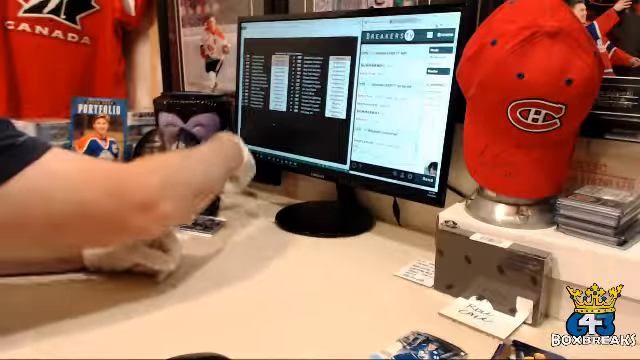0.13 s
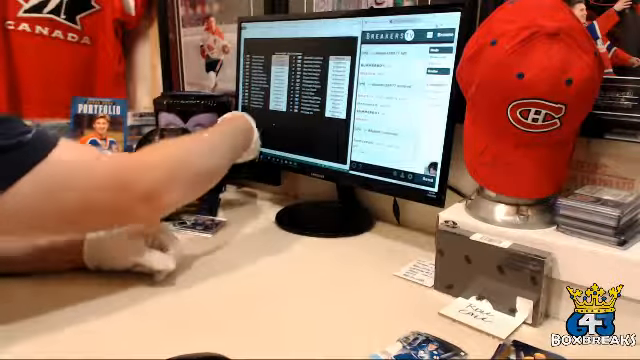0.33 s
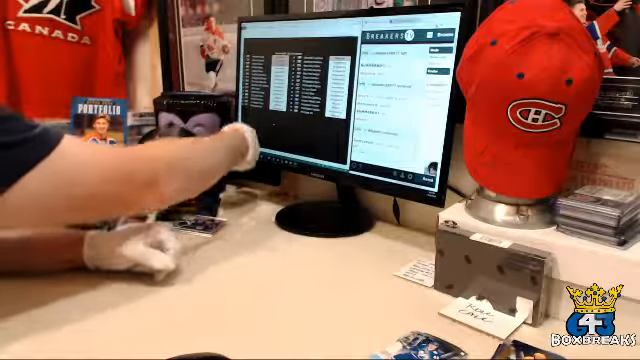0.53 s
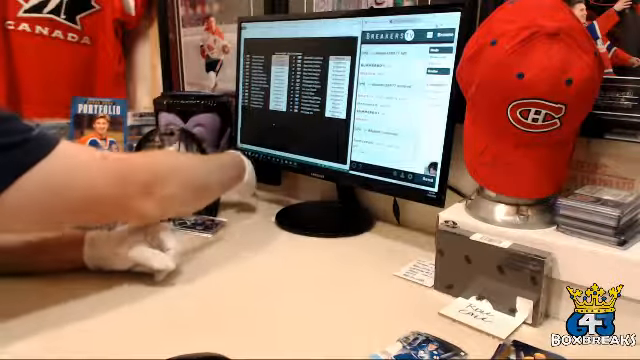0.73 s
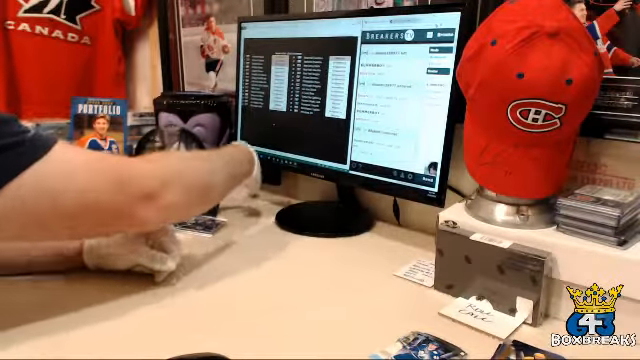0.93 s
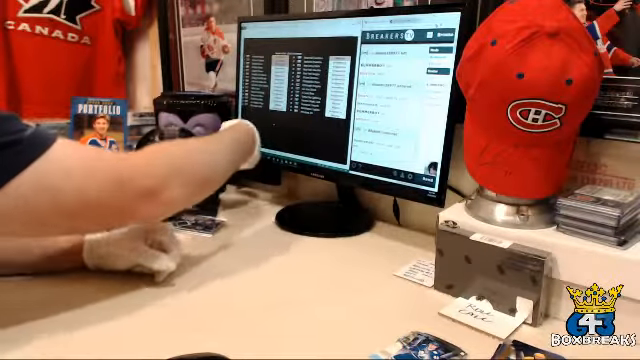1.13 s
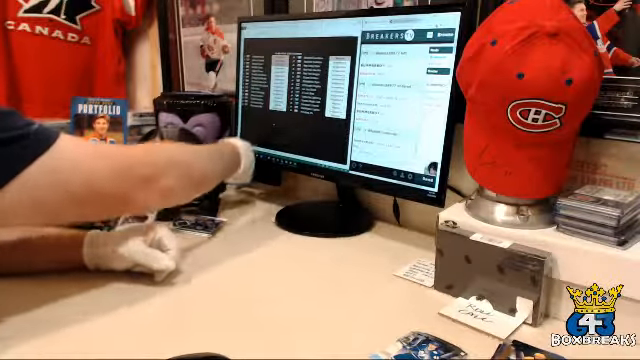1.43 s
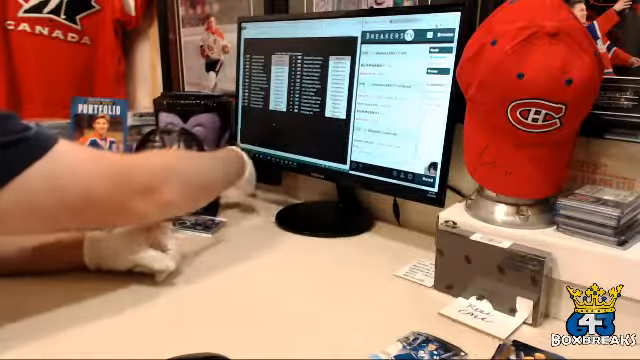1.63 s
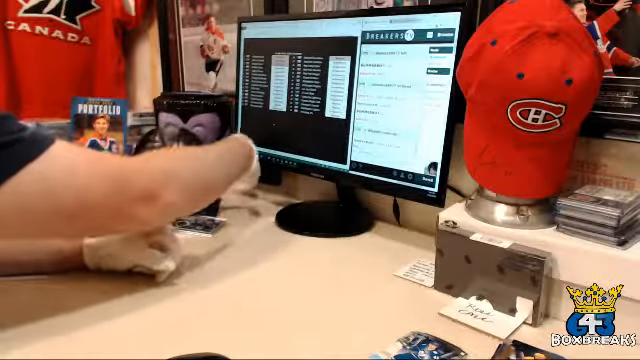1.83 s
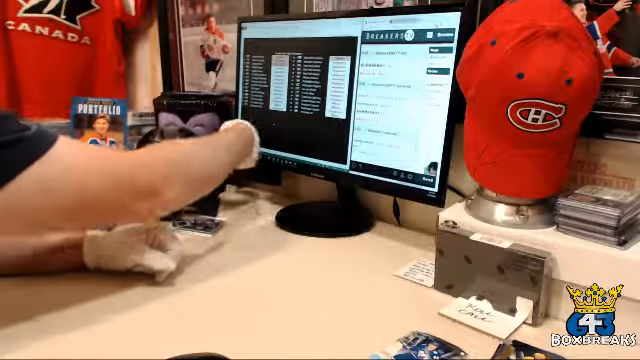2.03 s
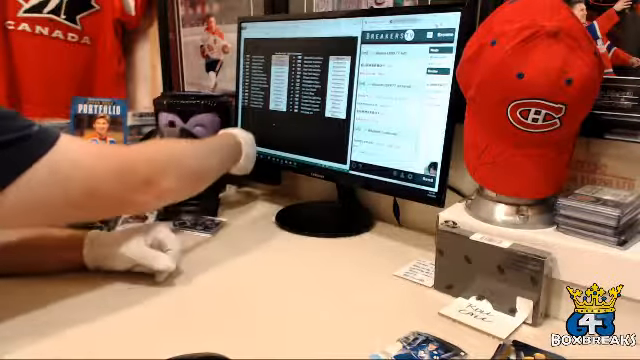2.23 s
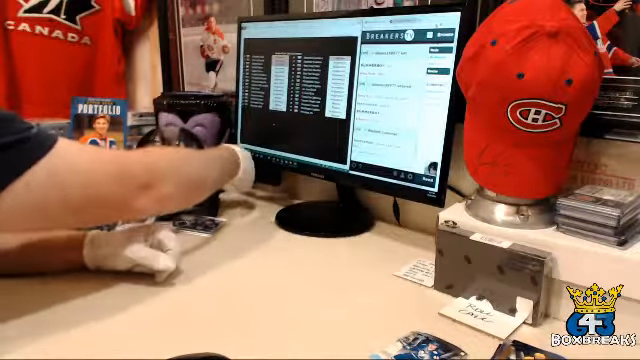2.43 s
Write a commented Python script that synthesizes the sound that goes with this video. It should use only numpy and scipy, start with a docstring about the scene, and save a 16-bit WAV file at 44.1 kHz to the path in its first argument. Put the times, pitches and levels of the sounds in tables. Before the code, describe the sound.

Balls tumble inside a turning wire cage, clacking together and ringing the wires, loudest near the start and gentler later. The stand rumbles and knocks on the desk, slightly to the left, over faint room noise.

```python
"""Light balls tumble in a small wire cage, cranked by hand on a desk, in a dense bright rattle that
surges with each fall. Each impact excites the damped modes of a body: balls crack together, the wires
ring as balls roll over them or land in heaps, and the stand rumbles and thuds on the desk. The low
sounds lie to the left, with a diffuse stereo spread, over a faint low room noise."""
import sys
import numpy as np
from scipy import signal
from scipy.fft import rfft, irfft
from scipy.io import wavfile

SR = 44100
rng = np.random.default_rng(int(sys.argv[2]) if len(sys.argv) > 2 else 0)


def store_wav(level_fs):
    """Save 16-bit WAV to argv[1]."""
    pcm = np.round(np.clip(np.atleast_2d(level_fs), -1, 1) * 32767)
    wavfile.write(sys.argv[1], SR, pcm.T.astype(np.int16))


N = 114660

# ball-on-ball rattle: t/s, level/dB, share of the lower treble/dB
RATTLE_LEVELS = [(0, -48.5, -1), (.105, -45, -0.5), (.125, -39, -3.5), (.17, -45.5, -0.5),
                 (.221, -42, -2.5), (.228, -20.5, -8.5), (.246, -28, -4.5), (.27, -20.5, -0.5),
                 (.31, -19, -1.5), (.345, -21.5, -4), (.37, -27, -2.5), (.382, -30.5, -28),
                 (.41, -34.5, -4), (.435, -27, -16), (.46, -41.5, -4), (.476, -38, 0), (.5, -41, -1),
                 (.525, -39, -1.5), (.63, -45, -0.5), (.648, -37, -3), (.665, -39, -4.5), (.695, -31, -1),
                 (.708, -25.5, -4), (.73, -32.5, -2), (.742, -38, -1), (.766, -26.5, 0),
                 (.797, -34.5, -6.5), (.811, -27, -1), (.835, -29.5, -13), (.86, -36, -4), (.875, -39, -3),
                 (1.206, -42.5, -1.5), (1.213, -38.5, 1), (1.235, -40, -5.5), (1.265, -34.5, 2),
                 (1.3, -40.5, -2.5), (1.34, -35.5, -2), (1.378, -26, -5.5), (1.405, -36, -5),
                 (1.53, -38, -1), (1.69, -43.5, -2), (1.71, -38.5, -1.5), (1.8, -40, -2),
                 (1.88, -37.5, -1.5), (1.93, -38.5, -1.5), (2.01, -34.5, -0.5), (2.05, -40.5, -2),
                 (2.19, -38, -2.5), (2.36, -42.5, -2), (2.4, -39.5, -2.5), (2.54, -39, -1)]
# balls rolling on the wires, stand rumbling on the desk: t/s, level/dB
ROLL_LEVELS = [(0, -53), (.1, -50), (.14, -50.5), (.22, -51.5), (.229, -28), (.3, -30), (.37, -32),
               (.392, -47.5), (.45, -39.5), (.52, -47.5), (.63, -47.5), (.71, -41), (.77, -44.5),
               (.84, -43), (.95, -45.5), (1.2, -48.5), (1.213, -42.5), (1.33, -39.5), (1.39, -36.5),
               (1.42, -44), (1.5, -45.5), (1.54, -49), (1.69, -46), (1.72, -45.5), (1.93, -45),
               (2.008, -42), (2.05, -46.5), (2.14, -41), (2.24, -47), (2.37, -47.5), (2.4, -45),
               (2.55, -45)]
RUMBLE_LEVELS = [(0.0, -52), (.21, -52), (.29, -41.5), (.4, -45.5), (.55, -51), (0.74, -42.5), (.93, -47.5),
                 (1.18, -53), (1.27, -40), (1.4, -44.5), (1.67, -51.5), (1.74, -51), (2.0, -45), (2.3, -47),
                 (2.6, -47)]
# spectral envelopes of the three bodies and the room noise: f/Hz, spectral level/dB
BALL_SPECTRUM = [(1940, -28), (3300, -10.5), (3930, -9.5), (4770, -4), (5820, -4), (6300, -5.5), (6650, -4),
                 (7590, -9), (8750, -23.5), (9300, -73)]
WIRE_SPECTRUM = [(390, -23), (660, -5), (719, 1.5), (870, 0.5), (955, 2.5), (1140, 3.5), (1430, -2.5),
                 (1590, 2), (1960, 0.5), (3600, -15), (4680, -42)]
DESK_SPECTRUM = [(25, -34.5), (43, -25.5), (111, -4.5), (136, 0), (281, -0.5), (321, -7), (367, -9),
                 (620, -10.5), (810, -62.5)]
AIR_SPECTRUM = [(20, -22), (80, -17), (140, 2.5), (300, -2.5), (600, -13.5)]
# normal modes: f/Hz, gain/dB, bandwidth/Hz
BALL_MODES = [(4424, -0.5, 65), (4720, 5, 40), (4930, 1, 89), (6230, 1.5, 104), (6434, 2.5, 87),
              (6526, 10.5, 10), (6830, 4.5, 190), (7300, 2.5, 160)]
WIRE_MODES = [(714, 8.6, 71), (805, 0.59, 39), (953, 8.6, 38), (1095, 4.8, 17), (1194, 3, 113),
              (1528, 5.6, 39), (1625, 6.4, 25), (2102, 3.7, 17), (2216, 6.5, 30), (2303, 1, 22),
              (2510, 2.5, 81), (2703, 15, 13), (3407, 6.1, 65)]
DESK_MODES = [(105, 10.2, 11), (143, 7, 19), (203.4, 3.5, 54), (238.2, 2.1, 28), (314.3, 9.3, 26),
              (324.8, 2.2, 19), (360, 6.3, 41), (411.7, 1.5, 160)]
# impacts: centre t/s, duration/s, favoured f/Hz, level/dB
HEAP_CLANGS = [(.142, 0.022, 897, -41), (.235, 0.0094, 1200, -25), (.253, 0.016, 1120, -21),
               (.254, 0.041, 2380, -28), (.32, 0.13, 1330, -33.5), (.345, 0.031, 1063, -36),
               (.43, 0.029, 990, -35.5), (.46, 0.029, 910, -31.5), (.659, 0.034, 2160, -37),
               (.71, 0.013, 2250, -28), (.65, 0.02, 980, -44), (.735, 0.057, 2410, -36.5),
               (.825, 0.037, 1227, -34), (.86, 0.026, 1200, -42), (.935, 0.024, 920, -40.5),
               (1.231, 0.024, 3280, -40), (1.329, 0.015, 2200, -34), (1.33, 0.0048, 697, -39),
               (1.365, 0.016, 1095, -32), (1.365, 0.051, 3070, -34.5), (1.495, 0.032, 1230, -40.5),
               (1.499, 0.035, 2220, -40), (1.837, 0.024, 1240, -44.5), (1.885, 0.05, 1260, -41.5),
               (1.965, 0.019, 1240, -37.5), (2.007, 0.023, 657, -42.5), (2.009, 0.028, 1102, -36.5)]
STAND_THUDS = [(.436, 0.052, 161.4, -36), (.5, 0.058, 123.4, -39.5), (.587, 0.029, 146, -37),
               (.65, 0.024, 346, -38.5), (.701, 0.029, 303, -30), (.768, 0.052, 285, -34),
               (.81, .035, 348, -32.5), (.879, 0.065, 320, -41.5), (.94, 0.049, 332, -44),
               (1.274, 0.027, 218, -32), (1.29, 0.013, 325, -32.5), (1.387, 0.044, 148, -36),
               (1.382, 0.04, 328, -30.5), (1.441, 0.053, 344, -41.5), (1.497, 0.018, 275, -35),
               (1.735, 0.041, 374, -40), (1.78, 0.036, 233, -41), (1.938, 0.053, 133, -42.5),
               (2.0, 0.022, 433, -36), (1.996, 0.022, 117.4, -42.5), (2.011, 0.068, 241, -41.5),
               (2.057, 0.18, 357, -44.5), (2.138, 0.022, 313, -30.5), (2.17, 0.04, 159.4, -32),
               (2.203, 0.046, 138.6, -32.5), (2.226, 0.028, 368, -37), (2.257, 0.039, 124, -41.5),
               (2.278, 0.021, 275, -33.5), (2.42, 0.06, 308, -44.5)]
BALL_CLACKS = [(.5, 0.014, 6400, -32), (.697, 0.0067, 5950, -23), (.712, 0.018, 6160, -26.5),
               (.768, 0.031, 4330, -32.5), (.812, .014, 7200, -27), (1.215, 0.01, 5560, -35)]
WIRE_NOTES = [(1.284, 0.027, 972, -30), (1.33, 0.038, 2760, -34), (1.722, 0.033, 1590, -39),
              (1.765, 0.033, 1620, -41), (2.024, 0.043, 1600, -34.5), (2.155, 0.039, 950, -36),
              (2.28, 0.12, 2700, -55.5)]
# stereo balance: f/Hz, left minus right level/dB
LEFT_BIAS = [(60, 2.5), (100, 7), (180, 8.5), (310, 0), (550, 4.5), (950, 2.5), (1650, 1.5), (2870, -1),
             (4980, 0), (8650, 1)]
# diffuse stereo spread: f/Hz, level relative to the direct sound/dB
STEREO_WIDTH = [(60, 4), (150, -27), (500, -22.5), (1200, -36.5), (2200, -48), (2900, -10), (4200, -21),
                (5000, -31.5), (8500, -33)]

CONTACTS_PER_S, CONTACT_SPREAD_DB = 12000, 3.0
CLUMP_DB, CLUMP_HZ = 2, 46
MODE_SPREAD_DB, SWELL_EXPONENT = 3.5, 2.96   # an exponent above 2 flattens the top of the bell
TILT_DB_PER_DB, GENTLE_DB, THINNING = 0.3949, -55.5, 1.25
SPLIT_HZ, CUTOFF_HZ = 5350, 9170
AIR_DB, DIFFUSION_S = -59.5, 0.1


def from_db(db):
    """Amplitude ratio of a level."""
    return 10 ** (np.asarray(db) / 20)


def unit_rms(x):
    """Normalisation to rms 1."""
    return x / np.sqrt(np.mean(x ** 2) + 1e-20)


def in_time(rows):
    """Linear interpolation of each column at every sample."""
    times, *columns = np.transpose(rows)
    return [np.interp(np.arange(N) / SR, times, column) for column in columns]


def response(points):
    """Frequency response on the FFT grid, and steep skirts outside the table's range."""
    hz, db = np.transpose(points)
    log_f = np.log(np.arange(1, N // 2 + 2) * SR / N)
    outside = np.maximum(np.log(hz[0]) - log_f, 0) + np.maximum(log_f - np.log(hz[-1]), 0)
    return from_db(np.interp(log_f, np.log(hz), db)), from_db(-120 * outside)


def contacts():
    """Shot noise: impulses of random size and sign, clumped by slow amplitude modulation."""
    sizes = from_db(CONTACT_SPREAD_DB * np.minimum(rng.exponential(1, N), 3.2)) * rng.choice([-1, 1], N)
    r = np.exp(-2 * np.pi * CLUMP_HZ / SR)
    clumps = unit_rms(signal.lfilter([1], [1, -2 * r, r * r], rng.standard_normal(N)))
    return unit_rms(sizes * from_db(CLUMP_DB * clumps) * (rng.random(N) < CONTACTS_PER_S / SR))


def body(force, modes, spectrum):
    """Superposition: the contact plus one damped resonator per mode, under a spectral envelope."""
    out = force.copy()
    for hz, db, width in modes:
        r = np.exp(-np.pi * width / SR)
        feedback = [1, -2 * r * np.cos(2 * np.pi * hz / SR), r * r]
        out += from_db(db) * signal.lfilter([(1 - r * r) / 2, 0, (r * r - 1) / 2], feedback, force)
    gain, skirts = response(spectrum)
    return irfft(rfft(out) * gain * skirts, N)


def tumble(level_db, modes, spectrum):
    """Forced vibration of a body under random contacts."""
    hits = contacts()
    return body(hits * from_db(level_db), modes, spectrum) / np.std(body(hits, modes, spectrum))


def ball_rattle():
    """Collisions excite the balls' modes; lower and upper treble divide the power in a varying ratio."""
    level_db, low_db = in_time(RATTLE_LEVELS)
    low, high = (signal.sosfilt(signal.butter(4, SPLIT_HZ, kind, fs=SR, output="sos"),
                                tumble(0, BALL_MODES, BALL_SPECTRUM)) for kind in ("low", "high"))
    share = np.clip(from_db(low_db), .1, .97)
    return from_db(level_db) * (share * unit_rms(low) + np.sqrt(1 - share ** 2) * unit_rms(high))


def rolling():
    """Rolling contact drives the wires; harder rolling tilts the spectrum from bass to treble."""
    level_db, = in_time(ROLL_LEVELS)
    roll = tumble(level_db, WIRE_MODES, WIRE_SPECTRUM)
    tilt = from_db(TILT_DB_PER_DB * (level_db - GENTLE_DB))
    low, high = (signal.sosfiltfilt(signal.butter(4, hz, kind, fs=SR, output="sos"), roll)
                 for hz, kind in ((880, "low"), (2600, "high")))
    return roll + low * (tilt ** -THINNING - 1) + high * (tilt - 1)


def stand_rumble():
    """Structure-borne sound: the stand drives the desk's low modes."""
    return tumble(in_time(RUMBLE_LEVELS)[0], DESK_MODES, DESK_SPECTRUM)


def room_noise():
    """Low ambient noise, uncorrelated between the sides."""
    gain, skirts = response(AIR_SPECTRUM)
    return from_db(AIR_DB) * unit_rms(irfft(rfft(rng.standard_normal((2, N))) * gain * skirts, N))


def knocks(events, modes, reach_octaves, chatter, chatter_rise=0):
    """Band-limited bursts: modes near the favoured pitch rise and fall under a bell-shaped envelope amid
    contact noise."""
    out, hits = np.zeros(N), contacts()
    hz, db, _ = np.transpose(modes)
    shape = len(events), len(hz)
    phases, scatters = rng.random(shape), rng.standard_normal(shape)
    for (centre, length, pitch, level_db), phase, scatter in zip(events, phases, scatters):
        n = np.arange(N)[max(int((centre - 2 * length) * SR), 0):int((centre + 2 * length) * SR)]
        swell = np.exp(-np.abs(2 * (n / SR - centre) / length) ** SWELL_EXPONENT)
        nearness = np.exp(-.5 * (np.log2(hz / pitch) / reach_octaves) ** 2)
        gains = from_db(db + MODE_SPREAD_DB * scatter) * nearness
        partials = np.sin(2 * np.pi * (np.outer(hz, n) / SR + phase[:, None]))
        ring = (gains / np.sqrt(np.sum(gains ** 2) / 2)) @ partials
        edges_hz = pitch * 2 ** (1.13 * reach_octaves * np.array([-1, 1]))
        noise = signal.sosfilt(signal.butter(2, edges_hz, "band", fs=SR, output="sos"), hits[n])
        noise /= np.sqrt(np.average(noise ** 2, weights=swell ** 2))
        noise_share = np.clip(chatter * (pitch / 1000) ** chatter_rise, 0, 1)
        blow = np.sqrt(1 - noise_share ** 2) * ring + noise_share * noise
        out[n] += from_db(level_db) * swell * blow / np.sqrt(np.average(blow ** 2, weights=swell ** 2))
    return out


def heap_clangs():
    """The impact of a heap of balls excites the wires' modes; higher clangs are noisier."""
    return knocks(HEAP_CLANGS, WIRE_MODES, reach_octaves=.14, chatter=.66, chatter_rise=.23)


def stand_thuds():
    """The stand's impacts excite the desk's modes."""
    return knocks(STAND_THUDS, DESK_MODES, reach_octaves=.23, chatter=.45)


def ball_clacks():
    """Single collisions briefly excite the balls' high modes."""
    return knocks(BALL_CLACKS, BALL_MODES, reach_octaves=.062, chatter=.76)


def singing_wire():
    """Narrow-band resonance: one wire rings nearly alone."""
    return knocks(WIRE_NOTES, WIRE_MODES, reach_octaves=.05, chatter=.5)


def stereo(x):
    """A level difference sets the lows to the left; a decorrelated part in antiphase adds width."""
    n = np.arange(int(DIFFUSION_S * SR))
    diffuser = unit_rms(rng.standard_normal(len(n)) * from_db(-60 * n / len(n))) / np.sqrt(len(n))
    lean, direct = np.sqrt(response(LEFT_BIAS)[0]), rfft(x)
    side = direct * rfft(diffuser, N) * response(STEREO_WIDTH)[0]
    norm = 2 / (lean + 1 / lean)
    return irfft([direct * lean * norm + side, direct / lean * norm - side], N)


def scene():
    """Superposition of wires, balls, stand and room noise."""
    wires = rolling() + heap_clangs() + singing_wire()
    balls = ball_rattle() + ball_clacks()
    stand = stand_rumble() + stand_thuds()
    return stereo(balls + wires + stand) + room_noise()


def record(dry):
    """A steep low-pass filter limits the bandwidth."""
    return signal.sosfilt(signal.ellip(14, .5, 75, CUTOFF_HZ, fs=SR, output="sos"), dry)


dry = scene()
out = record(dry)
store_wav(out)
```